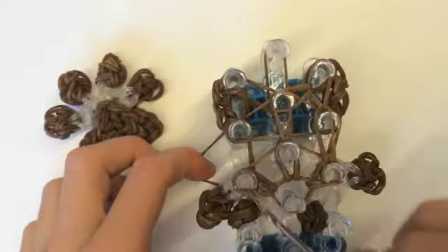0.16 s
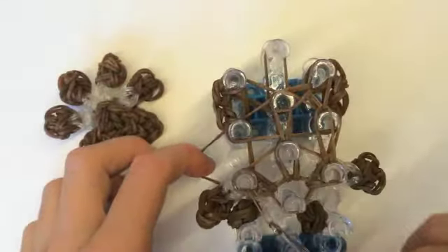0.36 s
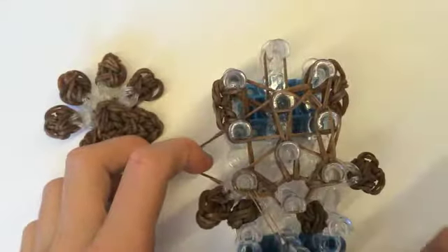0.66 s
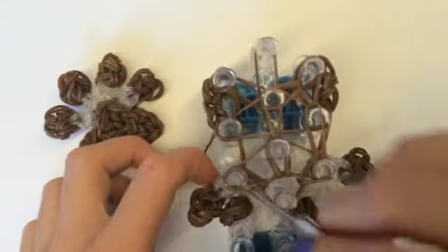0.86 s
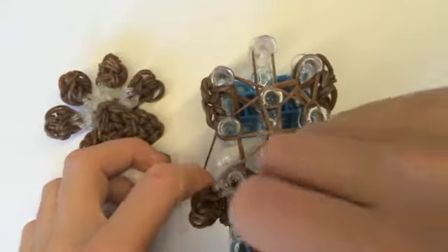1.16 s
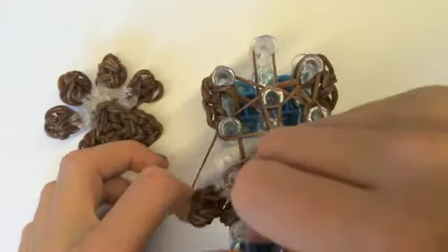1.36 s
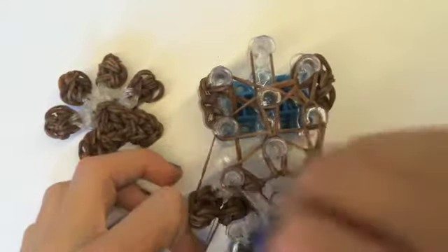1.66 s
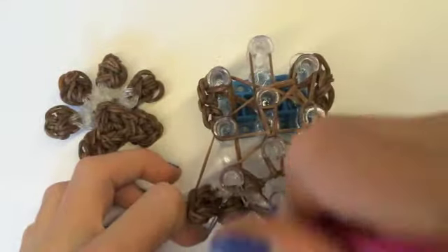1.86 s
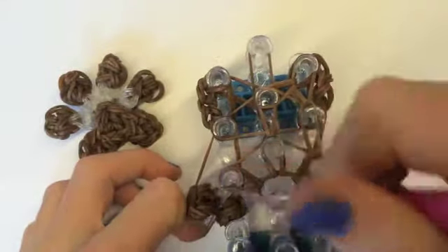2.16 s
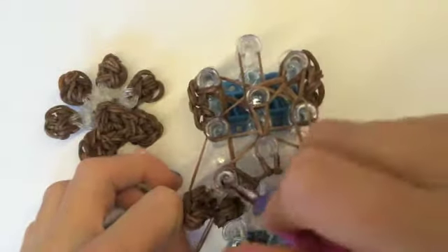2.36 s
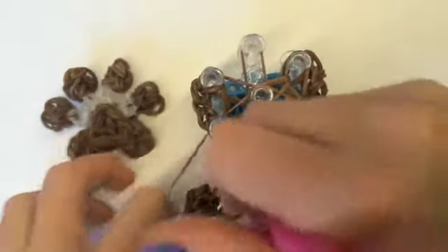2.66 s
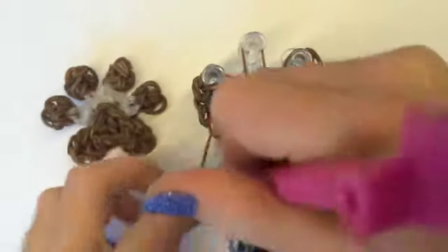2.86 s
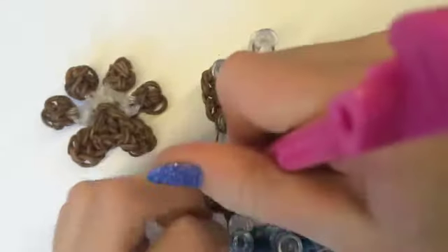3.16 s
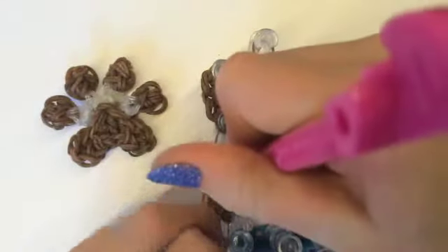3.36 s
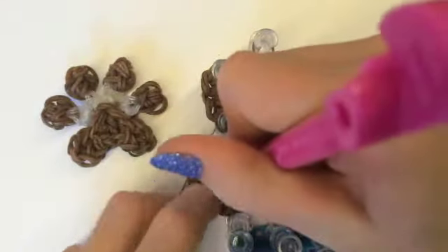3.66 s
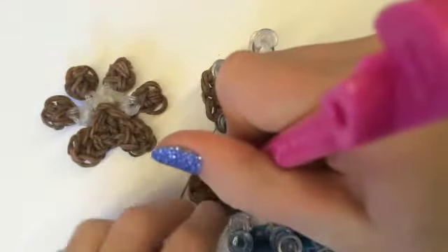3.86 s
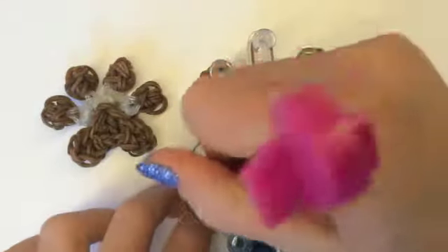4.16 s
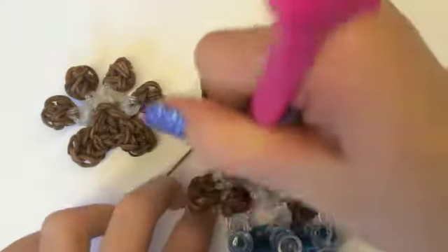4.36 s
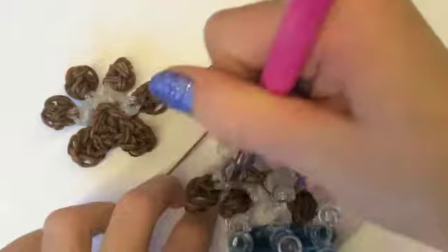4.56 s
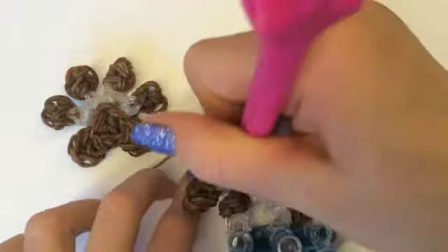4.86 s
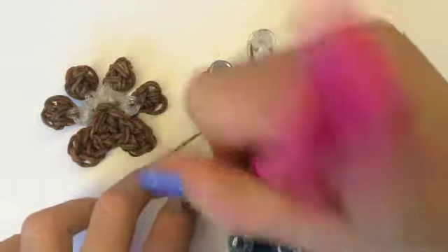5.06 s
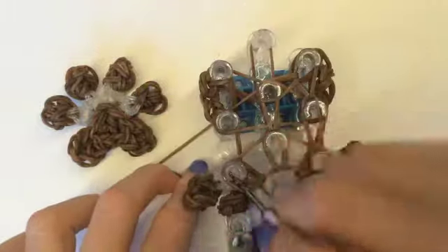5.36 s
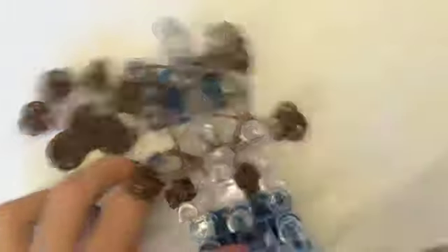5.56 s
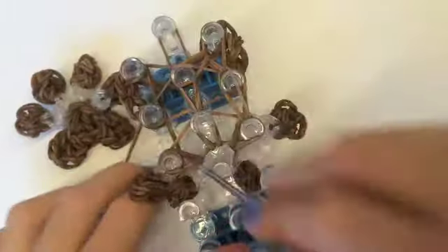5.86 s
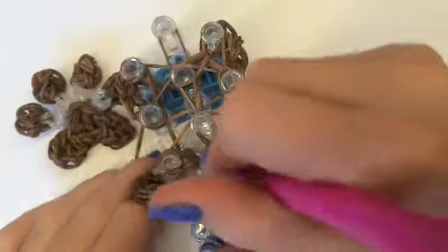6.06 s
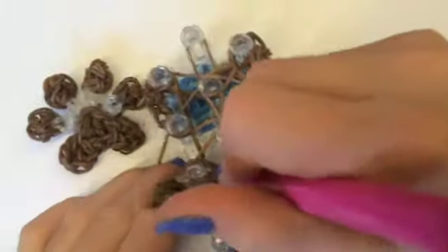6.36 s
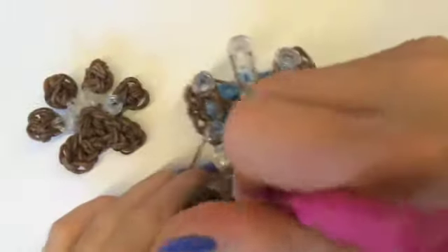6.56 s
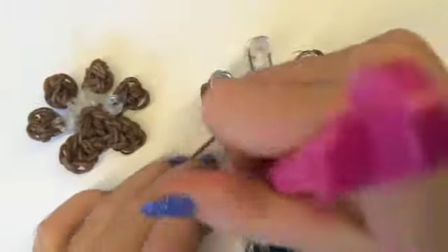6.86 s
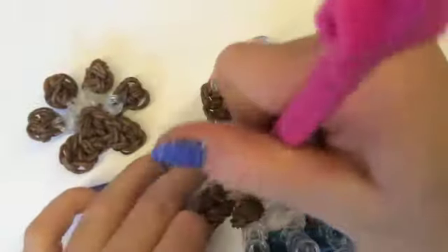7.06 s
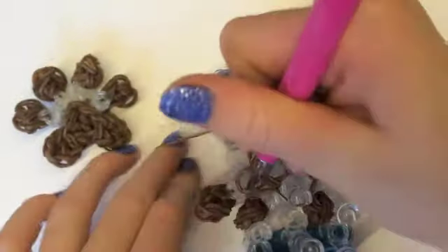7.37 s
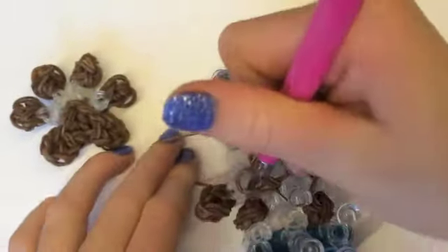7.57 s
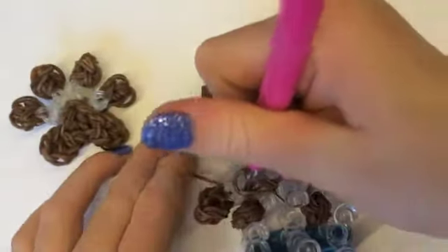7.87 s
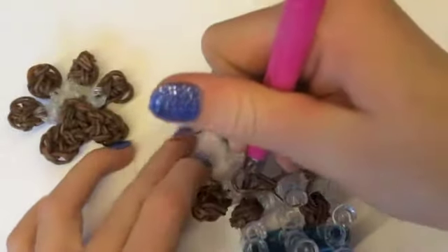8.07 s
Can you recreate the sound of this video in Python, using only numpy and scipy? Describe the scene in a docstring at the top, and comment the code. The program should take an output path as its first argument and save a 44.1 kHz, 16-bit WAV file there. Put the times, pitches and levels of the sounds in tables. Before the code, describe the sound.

A plastic hook clicks and ticks sparsely against small plastic loom pegs, with soft rubbing, low table thuds and faint room hiss.

```python
"""Rubber bands on a plastic loom

A plastic hook works rubber bands over the pegs of a small loom on a table, heard very close.
Noisy contacts ring the peg and base modes; fingers and bands rub as patchy, grainy noise, and a band squeaks.
The table top thuds as resonant noise, over coloured room hiss and a faint sine hum that comes up near the end."""
import sys
import numpy as np
from scipy import signal
from scipy.io import wavfile
from scipy.ndimage import uniform_filter1d

SR = 44100
rng = np.random.default_rng(int(sys.argv[2]) if len(sys.argv) > 2 else 0)


def dump_mix(stems):
    """Bounce the given channels to the path in sys.argv[1] as a 16-bit WAV at rate SR."""
    frames = np.atleast_2d(stems).T  # one column per channel
    limited = np.clip(frames, -1, 1)  # hard clip at full scale
    pcm = np.round(limited * 32767).astype(np.int16)
    wavfile.write(sys.argv[1], SR, pcm)


N = 361619

# colour of the room hiss: (frequency [Hz], relative density [dB per Hz])
HISS_COLOUR = [(15, -41), (25, 0.5), (136, 2.5), (246, -11), (322, -11.5), (552, -15), (997, -24.5),
               (1080, -34), (2920, -30), (7700, -33), (14300, -35), (15500, -35.5)]
# how long the echo lasts: (frequency [Hz], t60 [s])
ROOM_DECAY = [(200, 0.3), (1000, 0.28), (4000, 0.13), (14000, 0.081)]
# wrists press the table top: (start [s], end [s], level [dB])
WRIST_THUDS = [(-.05, 0.146, -53.5), (3.45, 3.568, -52.5), (3.605, 3.74, -47.5), (3.686, 3.813, -53),
               (3.818, 3.99, -47), (3.956, 4.1, -57), (4.467, 4.55, -50), (4.534, 4.653, -56),
               (5.496, 5.723, -52.5), (6.552, 6.658, -49), (6.711, 6.899, -47.5), (6.89, 7.092, -51),
               (7.126, 7.235, -56.5), (7.21, 7.37, -42.5), (8.076, 8.252, -58.5)]
# ringing modes of the loom's base: (frequency [Hz], relative level [dB], t60 when undamped [s])
BASE_MODES = [(227, -3, 0.22), (264, 0, 0.29), (304.4, -0.5, 0.25), (380.5, -4, 0.3), (495, 4.5, 0.089),
              (568, 0.5, 0.063), (690, -7.5, 0.032), (786, -3, 0.06), (845, 2, 0.039), (955, -1, 0.035),
              (1022, -7.5, 0.15), (1150, -2, 0.032), (1363, -3.5, 0.05)]
# ringing modes of the pegs: (frequency [Hz], relative level [dB], t60 [s])
PEG_MODES = [(1880, -8.5, 0.013), (2220, -7.5, 0.0052), (2590, 0, 0.015), (3017, 0.5, 0.014),
             (3500, 0, 0.0084), (4510, -5, 0.008), (5200, -4.5, 0.0016), (5670, -1.5, 0.014),
             (6100, -4, 0.02), (8410, 7, 0.0039), (9420, 1.5, 0.011), (10350, 7, 0.0036), (11960, 0, 0.011),
             (12900, -3.5, 0.0064)]
# how hard the hands rub between the scrapes: (time [s], level [dB])
HAND_RUBBING = [(0.0, -77), (0.3, -81), (0.68, -80.5), (1.03, -73), (1.34, -78.5), (2.56, -76), (3.11, -79),
                (3.47, -78), (4.11, -73.5), (4.75, -75.5), (5.1, -82), (5.48, -69.5), (5.75, -74.5),
                (6.03, -66.5), (6.2, -76.5), (6.48, -61), (6.78, -74), (7.05, -77), (7.67, -80.5),
                (8.2, -77.5)]
# short hard scrapes: (start [s], end [s], rubbing level [dB], shuffle level [dB])
HARD_SCRAPES = [(0.045, 0.096, -75, -87), (0.904, 0.957, -76, -68.5), (1.712, 1.773, -68, -56.5),
                (2.339, 2.433, -58.5, -70), (2.568, 2.717, -68.5, -72), (2.777, 2.837, -62.5, -63.5),
                (2.963, 3.088, -62.5, -65.5), (3.693, 3.89, -86.5, -71.5), (5.095, 5.238, -70.5, -81),
                (5.295, 5.415, -68, -99), (5.433, 5.55, -73.5, -66.5), (5.539, 5.679, -43.5, -49),
                (5.917, 6.04, -72.5, -74), (6.249, 6.464, -63, -65.5), (6.299, 6.374, -49, -54),
                (6.722, 6.8, -70.5, -92.5), (7.158, 7.206, -74.5, -65.5), (7.719, 7.867, -76.5, -90),
                (8.093, 8.227, -65.5, -65)]
# colour of skin and rubber on plastic: (frequency [Hz], relative density [dB per Hz])
RUB_COLOUR = [(710, -34), (1200, -10.5), (1780, -6.5), (2160, -5), (2680, -3), (3900, -8), (5980, -2.5),
              (6870, -5.5), (8150, -4), (13900, -9.5), (15500, -7.5)]
# a band drags over a peg in short hissing slips: (time [s], level [dB])
BAND_SLIPS = [(7.217, -59.5), (7.241, -63), (7.269, -58.5), (7.296, -55), (7.329, -58.5), (7.354, -62)]
# fixed rings above the squeak's note: (frequency [Hz], width [Hz], relative level [dB])
SQUEAK_RINGS = [(1680, 110, -1), (2500, 350, -8)]
# the lowest peg mode rung alone by a soft touch: (time [s], peak level [dB])
SOFT_PINGS = [(7.373, -62), (7.3845, -48), (7.398, -66)]
# clicks on the pegs: (time [s], peak of the low peg modes [dB], favoured pitch [Hz],
# high peg modes [dB rms], knock of the base [dB rms], favoured pitch of the knock [Hz])
PEG_CLICKS = [(0.0943, -56, 11800, -61.5, -62, 242), (0.9955, -33.5, 2460, -60, -49, 1350),
              (0.999, -72, 1800, -80, -52.5, 430), (1.055, -75, 1800, -85, -56, 270),
              (1.1879, -55.5, 2340, -74, -67, 293), (1.725, -46.5, 6000, -60, -58.5, 244),
              (1.757, -45, 2610, -69, -53, 380), (2.0282, -6.5, 5500, -23.5, -44.5, 1130),
              (2.0335, -14.5, 2550, -28, -32.5, 1270), (2.0482, -48, 6090, -32.5, -43, 365),
              (2.081, -21, 4760, -34.5, -42, 1130), (2.154, -66, 2500, -70, -57, 1280),
              (2.3501, -41, 3210, -69, -48, 258), (2.3694, -50, 5620, -69, -37, 286),
              (2.589, -59, 5410, -62.5, -51, 557), (2.613, -58, 1910, -66, -47.5, 900),
              (2.681, -65, 8620, -58, -65.5, 269), (2.7568, -51, 1970, -61, -54.5, 310),
              (3.1155, -60.5, 3050, -78, -70, 767), (3.47, -53.5, 2760, -76, -81, 261.5),
              (3.544, -52.5, 1880, -80, -67.5, 258.4), (3.5587, -54, 1570, -65, -69, 260),
              (3.579, -58, 2580, -72.5, -64.5, 800), (3.6713, -46.5, 1773, -63, -79, 257),
              (3.678, -50, 11500, -56.5, -64, 257), (3.941, -56, 3450, -85, -60, 388),
              (4.0805, -49, 3200, -63.5, -46, 264), (4.1331, -16.5, 2180, -52.5, -25.5, 739),
              (4.439, -59, 3130, -79.5, -72.5, 509), (4.546, -62, 3100, -68.5, -73, 300),
              (4.5574, -18, 5970, -27, -41, 252), (4.8058, -29, 2200, -54, -35.5, 816),
              (4.822, -48.5, 5730, -66, -60, 898), (4.8696, -55.5, 8950, -57, -74, 289),
              (5.165, -58, 3090, -72, -75, 505), (5.244, -28.5, 10100, -32.5, -51.5, 770),
              (5.525, -48, 3220, -67, -59, 790), (5.5463, -23, 3330, -45.5, -47.5, 254),
              (5.597, -55, 3300, -60, -43, 404), (5.664, -60, 1900, -75, -52, 380),
              (6.084, -55, 2600, -71, -75.5, 900), (6.2136, -40, 3370, -58, -59, 778),
              (6.324, -36, 2620, -64, -49, 500), (6.4958, -36.5, 2700, -53.5, -53, 334),
              (6.6087, -16.5, 2570, -35.5, -36.5, 560), (6.989, -54, 3410, -73, -60.5, 495),
              (7.1632, -58, 2110, -68.5, -56, 296), (7.838, -41.5, 3560, -67.5, -85, 251),
              (7.9321, -35.5, 3510, -51, -77, 614), (7.9924, -37, 3730, -60, -54.5, 612),
              (8.11, -49.5, 5010, -64.5, -50, 260)]

HISS_DB, ECHO_DB = -69, -16.5
HUM_HZ, HUM_DB, HUM_BEFORE_DB = 136, -63.5, -21  # the last is relative, until the rise
HUM_START_S, HUM_RISE_S, HUM_GROWTH_DB_PER_S = 7.45, 0.16, 0.5
TABLE_HZ, TABLE_WIDTH_HZ, WOBBLE_DB = 147, 28, -77.5
SCUFF_DB = -2  # shuffle of the base against the hands' rubbing
PUSH_DB, PUSH_S = -1.5, 0.064  # the shuffle also rocks the table top, smoothed by its weight
SLIP_S, SLIP_HZ, SLIP_LOW_DB = 0.0068, 6500, -2  # mostly treble above SLIP_HZ
# a stretched band squeaks over a peg; its pitch sags as the band slackens, down to a floor
SQUEAK_START_S, SQUEAK_RISE_S, SQUEAK_FALL_S = 2.99, 0.048, 0.065
SQUEAK_DB, SQUEAK_FROM_DB, SQUEAK_TO_DB = -50, -31, -31.5  # the ends are relative
SQUEAK_HZ, SAG_HZ_PER_S, SQUEAK_LOW_HZ = 1090, 2910, 870
CATCH_S, CATCH_FIRST_S, CATCH_DEPTH = 0.0208, 0.012, 0.6  # the band catches and lets go again and again
PING_RISE_S, PING_DETUNE = 0.0009, 0.94
SOFT_FAVOUR = 0.29  # a softer blow singles out its mode more, dB per dB
CONTACT_CYCLES = 0.54  # a knock's contact lasts this many cycles of its pitch
THUMP_HZ, THUMP_DB, THUMP_T60_S = 70, -13.5, 0.063  # the table gives under each knock
CLATTER_DB, CLATTER_T60_S = -13.5, 0.15  # loose parts after a knock
DAMP_DB_PER_S = -29.5  # the hands damp the base
DULL_HZ, EDGE_HZ = 15300, 16450


def gain_of(db):
    """Decibels to a factor."""
    return 10 ** (np.asarray(db) / 20)


def evened(x, count=None):
    """Bring to rms 1, judged over the first samples if a count is given."""
    return x / np.sqrt(np.mean(x[:count] ** 2) + 1e-20)


def read(points, hz):
    """Read a table along a log frequency axis."""
    f, value = np.transpose(points)
    return np.interp(np.log(hz + 1), np.log(f + 1), value)


def along(rows, count):
    """Follow one column of a curve, sample by sample."""
    rows = np.array(rows)
    return np.interp(np.arange(N) / SR, rows[:, 0], rows[:, count])


def swell(start, end, power):
    """A hump between two times, squarer for a small power."""
    out = np.zeros(N)
    at = np.arange(max(round(start * SR), 0), min(round(end * SR), N))
    out[at] = abs(np.sin(np.pi * (at / SR - start) / (end - start))) ** power
    return out


def resonate(x, hz, width_hz):
    """One pole at hz; for a moving hz, shift down to zero, smooth and shift back. Gain 1."""
    r = np.exp(-np.pi * width_hz / SR)
    if np.isscalar(hz):
        return 2 * signal.lfilter([1 - r], [1, -r * np.exp(2j * np.pi * hz / SR)], x).real
    turn = np.exp(2j * np.pi * np.cumsum(hz) / SR)
    return 2 * (turn * signal.lfilter([1 - r], [1, -r], x / turn)).real


def resonate_twice(x, hz, width_hz):
    """A steeper, evened resonance."""
    return evened(resonate(resonate(x, hz, width_hz), hz, width_hz))


def noise(points, patchy_db):
    """Random short-time spectra of a given colour, with drifting patches."""
    hz = np.fft.rfftfreq(512, 1 / SR)
    a, b, patches = rng.standard_normal((N // 128 + 5, 257, 3)).T
    patches = uniform_filter1d(patches, size=10, axis=0)
    patches = evened(uniform_filter1d(patches, size=14, axis=1))
    spectra = (a + 1j * b) * gain_of(read(points, hz)[:, None] + patchy_db * patches)
    return evened(signal.istft(spectra, nperseg=512, noverlap=384)[1][:N])


def ring(modes, extra_db, phase, count):
    """Dying sines, one a mode, none with a t60 under 3 ms."""
    hz, db, t60 = np.transpose(modes)[:, :, None]
    t = np.arange(count) / SR
    fall = gain_of(db + extra_db[:, None] - 60 * t / np.maximum(t60, 0.003))
    return (fall * np.sin(2 * np.pi * (hz * t + phase[:, None]))).sum(axis=0)


def near_db(modes, hz, db, reach):
    """A lift for the modes that lie close to the pitch hz."""
    return db * np.exp(-(np.log(np.array(modes)[:, 0] / hz) / reach) ** 2)


def pressure(count, hands_db=0):
    """The steady handling plus each scrape: a hump that swells quickly and stops short."""
    scrapes = sum(gain_of(row[count]) * swell(*row[:2], 0.82) for row in HARD_SCRAPES)
    return gain_of(along(HAND_RUBBING, count=1) + hands_db) + scrapes


def hiss():
    """Room hiss: steady noise, heaviest in the lows, with gently drifting patches."""
    return gain_of(HISS_DB) * noise(HISS_COLOUR, patchy_db=2.0)


def hum():
    """A low sine, far fainter until it comes in towards the end, then slowly growing."""
    t = np.arange(N) / SR
    rise = (t - HUM_START_S) / HUM_RISE_S
    before_db = HUM_BEFORE_DB * np.clip(1 - rise, 0, 1)
    growth_db = HUM_GROWTH_DB_PER_S * HUM_RISE_S * np.maximum(rise - 1, 0)
    return np.sqrt(2) * gain_of(HUM_DB + before_db + growth_db) * np.sin(2 * np.pi * HUM_HZ * t)


def table():
    """The table top wobbles near its one low mode, faintly all the time and more at each press and scuff."""
    push, t = rng.standard_normal(N), np.arange(N) / SR
    top = evened(resonate(resonate(push, TABLE_HZ, 2 * TABLE_WIDTH_HZ), TABLE_HZ, TABLE_WIDTH_HZ))
    deep = resonate_twice(push, 140, 61)
    wide = resonate_twice(push, 180, 100)
    tone = np.sqrt(2) * np.sin(2 * np.pi * TABLE_HZ * t)
    presses = sum(gain_of(db) * swell(start, end, 1.25) for start, end, db in WRIST_THUDS)
    shuffling = pressure(count=3, hands_db=SCUFF_DB)
    rocking = gain_of(PUSH_DB) * uniform_filter1d(shuffling, round(PUSH_S * SR))
    pressed = presses * (0.23 * tone + 0.56 * top + 0.26 * deep + 0.096 * wide)
    rocked = rocking * (0.18 * top + 0.35 * deep + 0.6 * wide)
    return gain_of(WOBBLE_DB) * top + pressed + rocked


def shuffle():
    """The base scuffs on the table as lumpy noise, and its modes ring on the scuffing."""
    fine = rng.standard_normal(N)
    lumps = evened(uniform_filter1d(rng.standard_normal(N), size=200))
    scuff = fine * gain_of(5.3 * lumps)
    base = sum(gain_of(db) * resonate(scuff, hz, 4.0 / t60) * np.sqrt(t60) for hz, db, t60 in BASE_MODES)
    grit = evened(resonate(fine, 1100, 1300))
    return pressure(count=3, hands_db=SCUFF_DB) * evened(evened(base) + 0.3 * grit)


def rubbing():
    """Skin and rubber slide on plastic: a hiss with tiny slips in it, coloured by the pegs."""
    # about 350 slips a second, each dying away over some forty samples
    slips = gain_of(3.3 * np.minimum(rng.exponential(1, N), 4)) * (rng.random(N) < 350 / SR)
    grain = signal.lfilter([1], [1, -0.975], slips)
    slide = noise(RUB_COLOUR, patchy_db=3.0) * (1 + 0.38 * grain)
    pegs = sum(gain_of(db) * resonate(slide, hz, 440) for hz, db, _ in PEG_MODES[2:8:2])
    return pressure(count=2) * evened(slide + 0.98 * pegs)


def drag():
    """Each slip of the dragged band is a short puff of bright friction noise."""
    friction = rng.standard_normal(N)
    bright = signal.lfilter(*signal.butter(2, SLIP_HZ, "high", fs=SR), friction)
    puffs = sum(gain_of(db) * swell(s, s + SLIP_S, 0.41) for s, db in BAND_SLIPS)
    return (bright + gain_of(SLIP_LOW_DB) * friction) * puffs


def squeak():
    """Stick-slip in bursts gives a fuzzy sagging note and shakes two fixed rings."""
    t = np.arange(0, SQUEAK_RISE_S + SQUEAK_FALL_S, 1 / SR)
    bursts = 1 + CATCH_DEPTH * np.cos(2 * np.pi * (t - CATCH_FIRST_S) / CATCH_S)
    hz = np.maximum(SQUEAK_HZ - SAG_HZ_PER_S * t, SQUEAK_LOW_HZ)
    slip = rng.standard_normal(len(t))
    fuzz = evened(resonate(resonate(slip, hz, 170), hz, 166))
    note = 1.2 * fuzz + 1.05 * np.sin(2 * np.pi * np.cumsum(hz) / SR)
    rings = sum(gain_of(db) * resonate_twice(slip, f, width) for f, width, db in SQUEAK_RINGS)
    db = SQUEAK_DB + np.interp(t, [0, SQUEAK_RISE_S, t[-1]], [SQUEAK_FROM_DB, 0, SQUEAK_TO_DB])
    voice = gain_of(db) * (note * np.sqrt(bursts) + bursts * rings)
    return np.pad(voice, (round(SQUEAK_START_S * SR), N))[:N]


def pings():
    """A soft touch rings the lowest peg mode, a little flat: a short pure note with a rounded start."""
    out, t = np.zeros(N), np.arange(1200) / SR
    hz, _, t60 = PEG_MODES[0]
    shape = (1 - np.exp(-t / PING_RISE_S)) ** 2 * gain_of(-60 * t / t60)
    note = shape * np.sin(2 * np.pi * PING_DETUNE * hz * t)
    for s, db in SOFT_PINGS:
        out[round(s * SR):][:len(t)] += gain_of(db) * note / abs(note).max()
    return out


def contacts(peak_db, knock_db):
    """A blow is a short noisy rattle of contacts; returns it and a briefer tick for the treble."""
    t, touches = np.arange(900) / SR, rng.standard_normal(900)
    # the more the base is knocked, the more its loose parts chatter after the hard first contact
    chatter = gain_of(0.056 * min(knock_db - peak_db, 0) - 1.0)
    tick = touches * (1 - np.exp(-t / 0.00056)) * (np.exp(-t / 0.00058) + 0.1 * np.exp(-t / 0.0023))
    rattle = touches * (1 - np.exp(-t / 0.00038)) * (np.exp(-t / 0.0022) + chatter * np.exp(-t / 0.004))
    rattle[12] += 16  # one clean first touch
    tick[16] += 2.5
    return rattle, tick


def peg_blow(rattle, tick, peak_db, hz, high_db):
    """The contacts ring some peg modes more than others, and are also heard directly, without any ring."""
    peg = np.array(PEG_MODES)
    low = peg[:, 0] < 7000
    favour_db = near_db(peg, hz, db=2.0 - SOFT_FAVOUR * peak_db, reach=0.083)
    favour_db = favour_db + near_db(peg, hz, db=8.0, reach=0.5) + rng.standard_normal(len(peg))
    # in cycles: neighbouring modes swing against each other
    phase = np.arange(len(peg)) / 2 + 0.06 * rng.standard_normal(len(peg))
    low_ring = ring(peg[low], favour_db[low], phase[low], count=1200)
    high_ring = ring(peg[~low], favour_db[~low], phase[~low], count=1200)
    body = evened(signal.fftconvolve(low_ring, rattle), count=400)
    snap = evened(signal.fftconvolve(high_ring, tick), count=400)
    middle = signal.lfilter(*signal.butter(3, [1500, 7200], "band", fs=SR), rattle)
    top = signal.lfilter(*signal.butter(4, 7000, "high", fs=SR), tick)
    body[:len(rattle)] += gain_of(0.5 + SOFT_FAVOUR * peak_db) * evened(middle, count=400)
    snap[:len(tick)] += 1.6 * evened(top, count=400)
    return gain_of(peak_db) * body / abs(body).max() + gain_of(high_db) * evened(snap, count=400)


def base_knock(rattle, db, hz):
    """A rounded contact rings the damped base, its loose parts clatter and the table gives with a thump."""
    t, slow = np.arange(len(rattle)) / SR, np.arange(7000) / SR
    # a knock reaches the modes near its pitch, further above than below
    reach = np.where(np.array(BASE_MODES)[:, 0] < hz, 0.45, 0.7)
    push = rng.standard_normal(len(BASE_MODES))
    lift_db = near_db(BASE_MODES, hz, db=17.5, reach=reach) + 1.3 * push
    base = ring(BASE_MODES, lift_db, 0 * push, count=7000) * gain_of(DAMP_DB_PER_S * slow)
    # a low knock is a longer, rounder contact
    contact = np.sin(np.pi * np.minimum(t * hz / CONTACT_CYCLES, 1)) ** 2
    knock = evened(signal.fftconvolve(base, evened(contact) + 0.06 * evened(rattle)), count=400)
    knock = signal.lfilter(*signal.butter(2, [200, 1500], "band", fs=SR), knock)
    loose = signal.butter(2, [0.48 * hz, 2.3 * hz], "band", fs=SR)
    knock[:len(t)] += 0.29 * evened(signal.lfilter(*loose, rattle), count=400)
    parts, lumps = rng.standard_normal((2, len(slow)))
    lumps = evened(uniform_filter1d(lumps, size=130))
    clatter = evened(signal.lfilter(*loose, parts)) * gain_of(3.3 * lumps)
    clatter_fall = gain_of(CLATTER_DB - 60 * slow / CLATTER_T60_S)
    knock[:len(slow)] += clatter * (1 - np.exp(-slow / 0.003)) * clatter_fall
    thump_fall = gain_of(THUMP_DB - 60 * slow / THUMP_T60_S)
    knock[:len(slow)] += thump_fall * np.sin(2 * np.pi * THUMP_HZ * slow)
    return gain_of(db) * evened(knock, count=400)


def clicks():
    """Each blow's rattle of contacts rings the pegs and knocks the base together."""
    out = np.zeros(N + 12000)
    for s, peak_db, hz, high_db, knock_db, knock_hz in PEG_CLICKS:
        rattle, tick = contacts(peak_db, knock_db)
        at = round(s * SR) - 16  # the contacts take a moment to build
        for part in (peg_blow(rattle, tick, peak_db, hz, high_db), base_knock(rattle, knock_db, knock_hz)):
            out[at:at + len(part)] += part
    return out[:N]


def room(x):
    """Three tails of sparse taps, fed in turn 17 times a second, each band dying at its own speed."""
    taps = np.zeros((3, SR // 2))
    at = np.arange(120, SR // 2 - 20, 20)
    places = at + rng.integers(0, 20, (3, len(at)))
    np.put_along_axis(taps, places, rng.choice([-1., 1.], (3, len(at))), 1)
    hz, t, spectra = signal.stft(taps, SR, nperseg=256)
    fall = gain_of(-60 * t / read(ROOM_DECAY, hz)[:, None])
    tail = signal.istft(spectra * fall, SR, nperseg=256)[1]
    turn = 2 * np.pi * (17 * np.arange(N) / SR + np.arange(3)[:, None] / 3)
    fed = x * np.sqrt(2 / 3) * np.cos(turn)
    return signal.fftconvolve(fed, tail / np.linalg.norm(tail[0]), axes=1)[:, :N].sum(axis=0)


def scene():
    """The loom and hands with their echo, over the table top, the hum and the hiss."""
    near = shuffle() + rubbing() + drag() + squeak() + pings() + clicks()
    return (hiss() + hum() + table() + gain_of(ECHO_DB) * room(near) + near)[None]


def record(dry):
    """The microphone loses the deepest bass and most of the top octave's end; then the band limit."""
    dull = signal.oaconvolve(dry, signal.firwin(301, DULL_HZ, fs=SR)[None], "same")
    rest = dry - dull
    dull = signal.lfilter(*signal.butter(2, 35, "high", fs=SR), dull)
    heard = dull + gain_of(-30.5) * rest
    edge = signal.firwin(511, EDGE_HZ, window=("kaiser", 9), fs=SR)
    return signal.oaconvolve(heard, edge[None], "same")


dry = scene()
out = record(dry)
dump_mix(out)
```